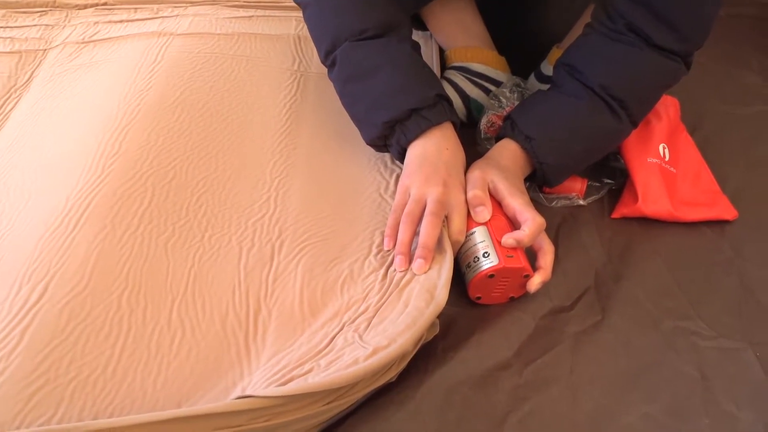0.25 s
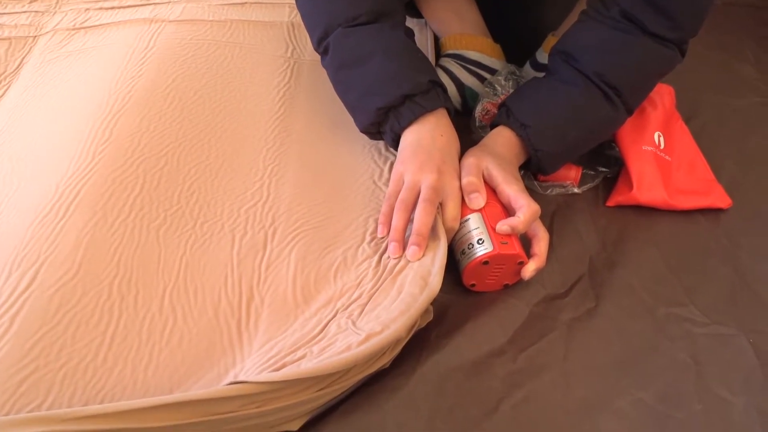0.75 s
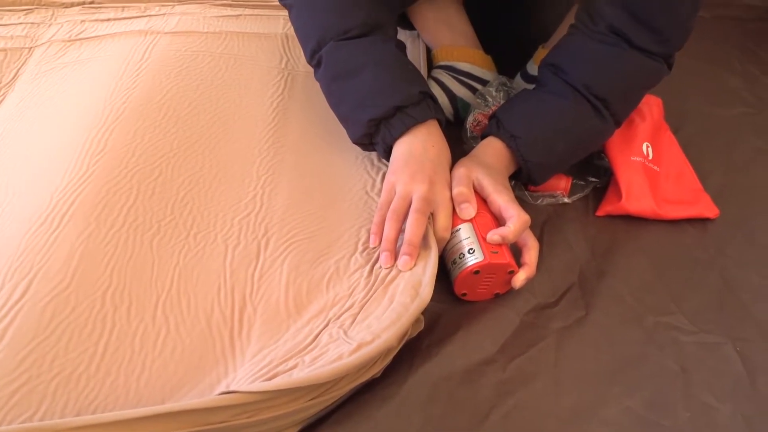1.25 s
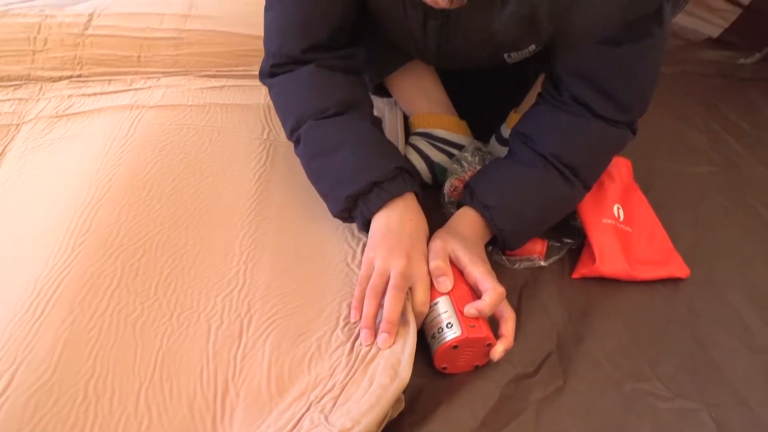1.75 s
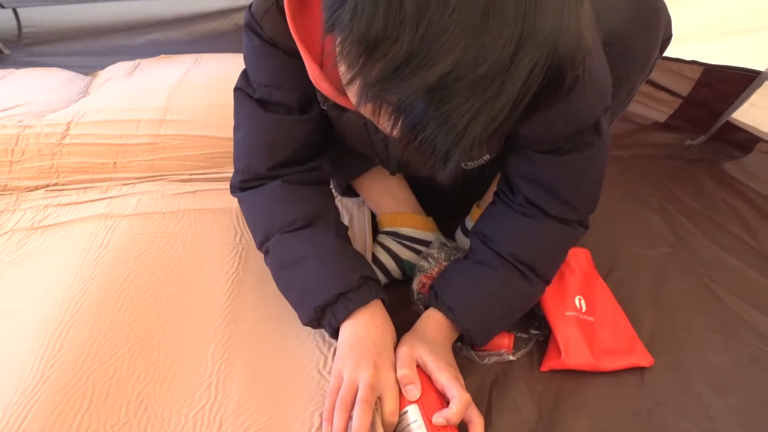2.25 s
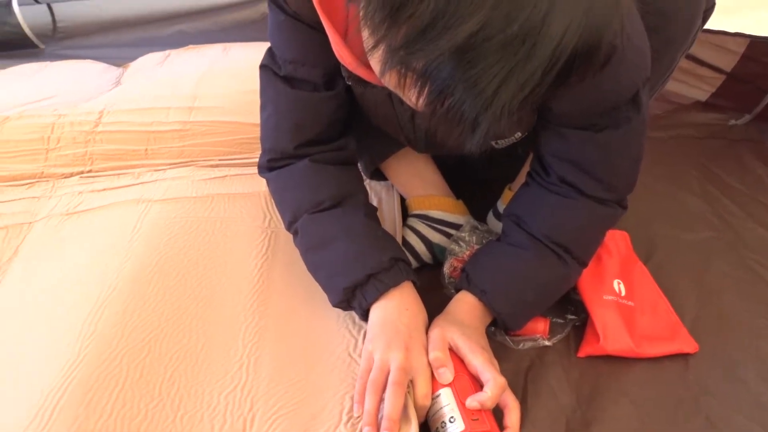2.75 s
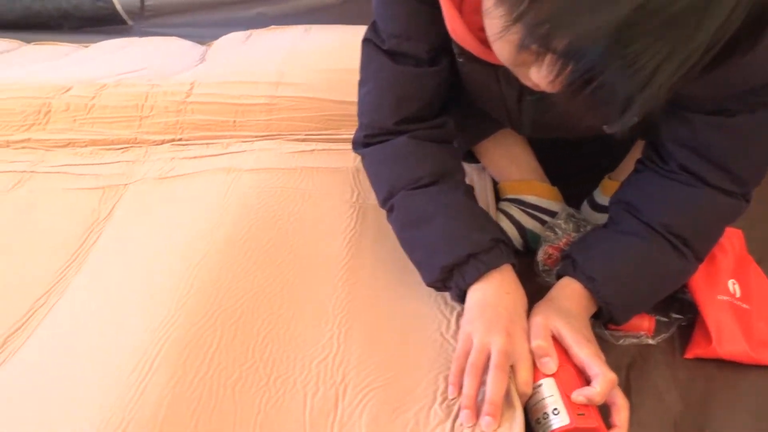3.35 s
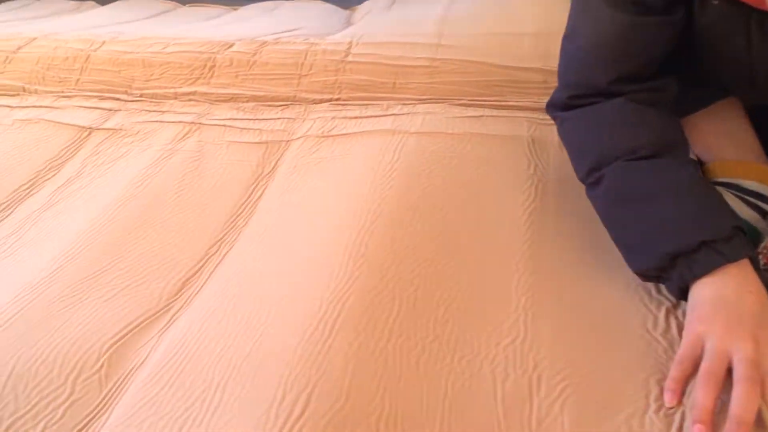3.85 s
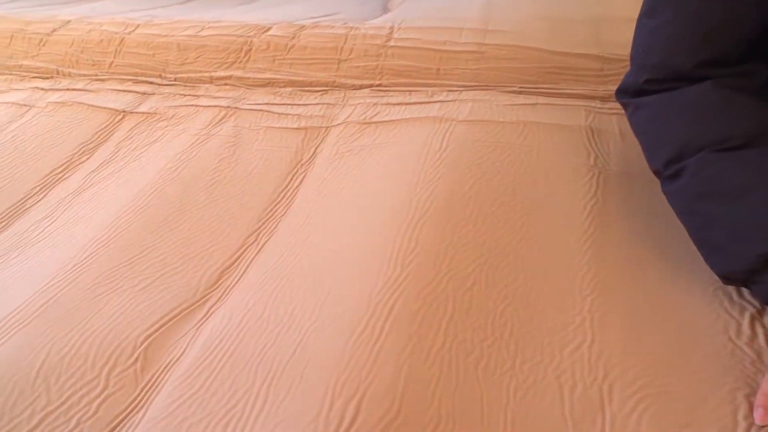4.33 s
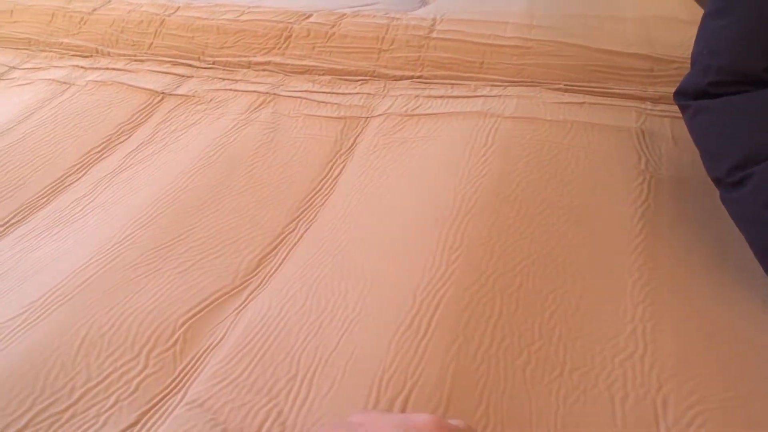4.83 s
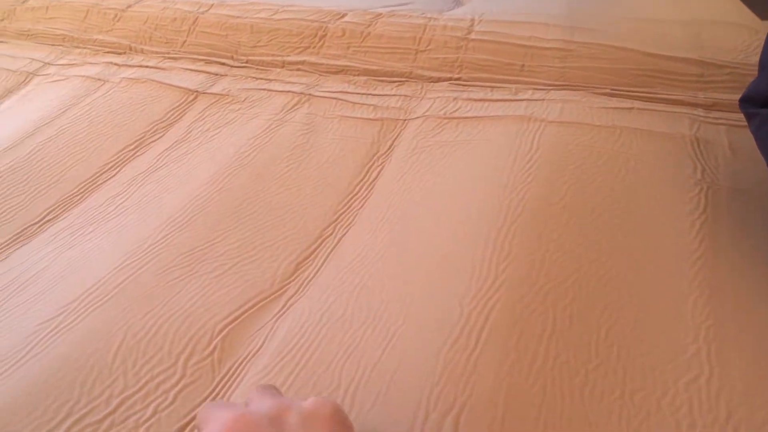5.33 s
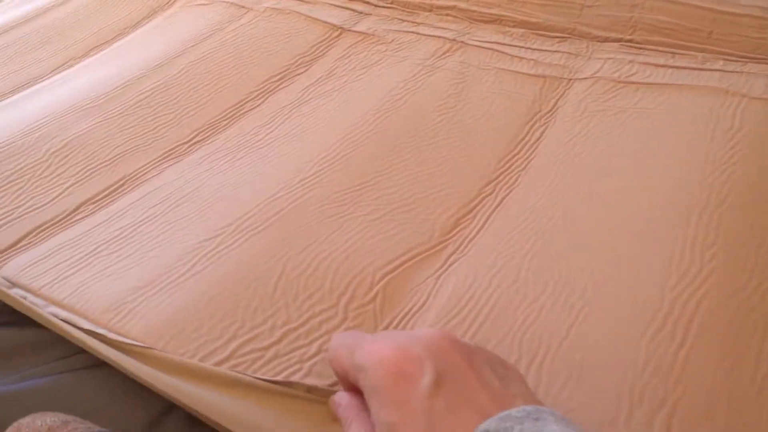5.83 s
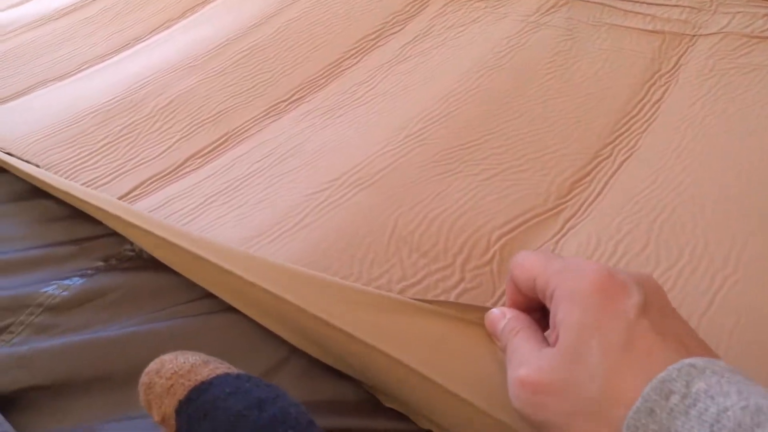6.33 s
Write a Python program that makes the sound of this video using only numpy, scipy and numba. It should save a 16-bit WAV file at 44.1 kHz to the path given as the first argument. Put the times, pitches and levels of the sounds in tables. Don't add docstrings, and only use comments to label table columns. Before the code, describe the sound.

Continuous motor whine and rushing air from a small battery pump filling a mat, strongest on the left, with soft camera knocks and brief cloth squeaks.

```python
import sys
import numpy as np
from scipy import signal
from scipy.fft import rfft, irfft, next_fast_len
from scipy.io import wavfile
from scipy.ndimage import uniform_filter1d
from numba import njit

SR = 44100
rng = np.random.default_rng(int(sys.argv[2]) if len(sys.argv) > 2 else 0)


def output_pcm(signal):
    pcm = np.clip(np.atleast_2d(signal).T, -1, 1) * 32767
    wavfile.write(sys.argv[1], SR, np.round(pcm).astype(np.int16))


def field_ratio(decibels):
    return 10 ** (np.asarray(decibels, dtype=float) / 20)


N = 290158
SIZE = next_fast_len(N)
HOP = 64
T = np.arange(N) / SR
HZ = np.arange(SIZE // 2 + 1) * SR / SIZE
LOG_HZ = np.log(HZ + 1)

# (time [s], aim [row])
AIM = [
    (0, 0),
    (1.6, 0),
    (2.04, 1),
    (3.32, 1),
    (3.74, 2),
    (4.1, 3),
    (5.3, 3),
    (5.75, 4),
    (6.2, 5.5),
    (6.58, 5),
]

# (time [s], peak [dB], centre [Hz], width [Hz], decay [s], left over right [dB])
FABRIC = [
    (2.05, -34, 9000, 7000, 0.065, 12),
    (4.875, -30, 8000, 150, 0.12, 12),
    (6.247, -30, 7900, 2000, 0.14, 16),
    (6.247, -42, 13500, 3000, .09, 14),
]
# (time [s], peak [dB], start [Hz], end [Hz], length [s])
CREAKS = [
    (.005, -42, 540, 290, 0.049),
    (0.116, -45, 370, 440, 0.044),
]

# (frequency [Hz], density [dB/Hz])
RUMBLE = [(2, -30), (5, -8), (10, 5), (20, 5), (30, -7.5), (48, -14.5), (62, -24.5), (90, -74)]
# (peak time [s], level [dB], length [s])
TREMORS = [(.38, -54, 0.25), (1.05, -48, .4), (1.55, -46, .4), (2.2, -60, .4), (2.44, -39, 0.14),
           (2.725, -34.5, 0.34), (2.923, -29, 0.21), (3.15, -49, 0.4), (3.425, -37, 0.41),
           (3.65, -38, 0.32), (3.95, -39, 0.47), (4.25, -40, 0.77), (4.582, -39, .2), (4.757, -36, 0.38),
           (5.168, -34, 0.25), (5.42, -38, 0.43), (5.674, -30, 0.48), (5.95, -41, 0.35), (6.34, -36, 0.68)]
# (frequency [Hz], density [dB/Hz])
GRIP_COLOUR = [(30, -40), (45, -22), (70, -2), (120, -7), (200, -5), (350, -5), (600, -60)]
# (peak time [s], level [dB], length [s])
RUBS = [
    (.35, -72, 1),
    (2.25, -62, 1),
    (3.1, -67, .5),
    (4.15, -64, 0.34),
    (4.98, -54, 0.34),
    (5.95, -55, 0.7),
    (6.45, -60, .5),
]
# (time [s], peak [dB], pitch [Hz], decay [s], left over right [dB])
KNOCKS = [(1.504, -41, 200, 0.073, -9), (2.274, -20, 202, 0.032, 25), (3.014, -36, 150, 0.054, 8),
          (3.958, -33, 190, 0.047, 20), (4.408, -35, 136, 0.043, 18), (4.868, -30, 150, 0.032, 22),
          (4.92, -34, 108, 0.051, 15), (4.97, -33, 135, 0.071, 10), (5.327, -33, 129, 0.044, 19),
          (5.779, -32, 130, .05, 28), (6.235, -35, 110, 0.066, 25), (6.529, -35.5, 130, 0.048, 13)]

# (frequency [Hz], left over right [dB])
RIGHT_LOSS = [(60, 10.0), (110, 9.0), (200, 11.5), (380, 14.1), (700, 19.0), (1290, 15.3), (2380, 14.9),
              (4400, 16.5), (8120, 11), (15000, 13.0)]
# (frequency [Hz], share [0-1])
STRAIGHT = [(60, .1), (300, .2), (600, .6), (1000, .5), (2500, .4), (5000, .3), (15000, .15)]

# (frequency [Hz], density [dB/Hz])
VALVE = [(3500, -61), (5500, 2), (6800, -4), (8500, -7.5), (10500, -9), (12000, -17), (13500, -15),
         (15000, -20), (16000, -23)]
# (turned away [0-1], flow [dB], nozzle [dB], hiss [dB], hiss left over right [dB])
FLOWS = [(.5, -25.5, -29.5, -36.5, 19), (.25, -25.5, -32, -37.5, 13), (.55, -28.5, -26.5, -38, 24),
         (.92, -28.5, -25, -38, 18), (1.03, -28.5, -25.5, -40.5, 8), (1.17, -29.6, -28.5, -42.5, 4)]
# (frequency [Hz], density [dB/Hz])
LOWS = [(60, -44), (150, -30), (300, -11), (410, -13), (700, -2), (1100, -3.5), (1800, -6), (2400, -20),
        (4000, -60)]
# (frequency [Hz], density [dB/Hz])
HIGHS = [(400, -60), (1000, -31), (1750, -3), (2450, -0.5), (3000, -1), (3650, 1), (4100, -0.5), (4500, 4),
         (5600, -2), (6150, -15.5), (6600, -5.5), (8000, -20.5), (11000, -65)]
# (centre [Hz], level [dB], left over right [dB])
INLET = [(912, -26.5, 31), (982, -28.5, 21), (957, -26.5, 20), (910, -34, 24), (827, -28.5, 11),
         (837, -28, 14)]
# (centre [Hz], level [dB], left over right [dB], far pitch [ratio])
VOLUTE = [(1408, -25, 16, 1.025), (1313, -25.5, 5.3, 1.18), (1400, -27, 21, 1.05), (1330, -28.5, 19, 1.04),
          (1290, -32, 15, 0.92), (1385, -32.5, 9.2, 0.97)]
# (centre [Hz], level [dB])
OUTLET = [(5450, -36), (5350, -34), (5270, -30), (5360, -32), (5080, -35), (4815, -52)]
# (peak time [s], level [dB], length [s])
LEAKS = [
    (.35, -37, .5),
    (3.42, -33, 0.97),
    (5.0, -37, 2.5),
]

# (time [s], rate [Hz])
SHAFT = [(0, 315.6), (.42, 315.25), (.7, 315.5), (1.53, 315.65), (1.75, 314.9), (2.1, 315.3), (2.37, 316.4),
         (2.6, 315.9), (3.07, 315.5), (3.22, 314.9), (3.48, 315.1), (3.74, 315.8), (4.0, 315.05),
         (4.65, 314.85), (5.18, 315.35), (5.45, 313.9), (5.72, 315.25), (6.45, 314.25)]
# (shaft multiple, left facing [dB], left away [dB], right facing [dB], right away [dB])
TONES = [(1, -47, -45, -69, -64), (3, -40, -41, -55, -58), (6, -39, -48, -55, -58), (8, -28, -21, -42, -38),
         (9, -40, -43, -53, -58), (10, -37, -38, -53, -53), (11, -34, -35, -55, -49),
         (12, -33, -38, -52, -55), (13, -41, -45, -55, -66), (14, -25, -37, -48, -54),
         (15, -31, -39, -49, -57), (16, -29, -33, -48, -47), (17, -40, -42, -55, -53),
         (18, -42, -40, -54, -50), (19, -41, -46, -54, -56)]
# (left facing [dB], left away [dB])
UPPER = [(-47, -55), (-42, -50), (-45, -54), (-53, -52), (-45, -58), (-56, -52), (-47, -49), (-53, -53),
         (-50, -51), (-52, -46), (-48, -46), (-46, -48), (-42, -53), (-45, -56), (-53, -57), (-45, -48),
         (-51, -54), (-55, -59), (-53, -65), (-49, -55), (-58, -66), (-59, -68), (-60, -70), (-49, -66),
         (-57, -66), (-57, -65), (-60, -71), (-66, -69), (-57, -70), (-54, -80)]
# (x8 [dB], x14 [dB], x16 [dB], brush x29-33 swing [dB], x37 and up swing [dB])
BEAMS = [(-47, -25, -37.5, -1.5, 6), (-24.5, -30.5, -28.5, 1, 3), (-38, -31.5, -31, 2.5, -3),
         (-23, -40.5, -38, 1, -.4), (-17, -31.5, -35, -2, 1.5), (-21, -50, -34, -5, 2)]
# (peak time [s], shaft multiple, gain [dB], length [s])
FLARES = [(0.55, 8, 14, .3), (1.9, 8, 3, 0.22), (1.13, 11, -7, 0.94), (3.35, 11, 7, 2.4),
          (5.3, 11, 2.5, 1.1), (0.94, 12, 6.5, 1.8), (6.1, 13, 3, 1.8), (1.53, 14, 2, 1.8),
          (3.5, 8, 0.5, 0.37), (5, 14, 9, 0.27), (.8, 15, 4, 2.4), (3.5, 15, -12, 1.3), (7.6, 15, 3, 0.5),
          (0.41, 16, -5, .6), (1.1, 16, 7, 0.76), (3, 16, 2.5, 1.8), (3.25, 16, -9, 0.47),
          (4.2, 16, -2, 0.18), (1.3, 17, -9, 1.6), (3.8, 20, -12, 2.8), (3.83, 28, 8, 0.76),
          (5.75, 28, 7, 0.71), (3, 29, -2, 1.6), (2.7, 31, 3, 1.6), (5.75, 31, -7, 0.68), (2.6, 33, 4, 1.9),
          (3.3, 34, 5, 1.2), (3.75, 39, -6, .6), (.8, 48, 9, 2.2)]


def columns(table):
    s, *rest = np.transpose(table)
    return [np.interp(T, s, c) for c in rest]


def aimed(table):
    aim = columns(AIM)[0]
    return [np.interp(aim, np.arange(len(table)), c) for c in np.transpose(table)]


def bump(s, length_s):
    return np.cos(np.pi * np.clip((T[::HOP] - s) / length_s, -.5, .5)) ** 2


def bouts(table, rest_db):
    swells = sum(field_ratio(db) * bump(s, length_s) for s, db, length_s in table)
    return np.interp(T, T[::HOP], field_ratio(rest_db) + swells)


def walk(rate_hz, hop=1):
    hold = int(SR / rate_hz / hop)
    size = len(T[::hop])
    steps = np.repeat(rng.standard_normal(size // hold + 1), hold)
    return 1.29 * uniform_filter1d(uniform_filter1d(steps, hold), hold)[:size]


def along(points):
    hz, value = np.transpose(points)
    return np.interp(LOG_HZ, np.log(hz), value)


def colour(x, gain):
    return irfft(rfft(x, SIZE) * gain, SIZE)[:N]


def noise(points):
    x = colour(rng.standard_normal(N), field_ratio(along(points)))
    return x / x.std()


@njit
def svf(x, hz, width_hz):
    y, band, low = np.empty(len(x)), 0., 0.
    for i in range(len(x)):
        g, k = np.tan(np.pi * hz[i] / SR), width_hz / hz[i]
        v = (band + g * (x[i] - low)) / (1 + g * (g + k))
        band, low, y[i] = 2 * v - band, low + 2 * g * v, k * v
    return y


def to_right(x):
    lag_samples = 4
    share = along(STRAIGHT)
    out = colour(x, np.sqrt(share) * np.exp(-2j * np.pi * HZ * lag_samples / SR))
    t = np.arange(SR // 8) / SR
    for middle_s in (.6, 2.6, 4.6, 6.4):
        tail = rng.standard_normal(len(t)) * (np.exp(-t / .002) + .35 * np.exp(-t / .04))
        tail = tail / np.sqrt(np.sum(tail ** 2))
        bounced = colour(x, np.sqrt(1 - share) * rfft(tail, SIZE))
        out += bounced * np.cos(np.pi / 2 * np.clip((T - middle_s) / 2, -1, 1))
    return out


def echoed(x, lag_s=.00081, share=.2):
    return colour(x, 1 + share * np.exp(-2j * np.pi * HZ * lag_s))


def shaft_angle(rate_hz):
    return 2 * np.pi * np.cumsum(rate_hz) / SR


def cloth():
    out = np.zeros((2, N))
    for s, db, hz, width_hz, decay_s, pan_db in FABRIC:
        puff = svf(rng.standard_normal(N), np.full(N, 1. * hz), 1. * width_hz)
        fall = (T > s) * np.exp(-np.log(1000) * np.maximum(T - s, 0) / decay_s)
        puff = puff / puff.std() * fall
        out += field_ratio(db) * puff * np.array([[1], [field_ratio(-pan_db)]])
    start = slice(0, SR // 4)
    for s, db, from_hz, to_hz, length_s in CREAKS:
        part = np.clip((T[start] - s) / length_s, 0, 1)
        glide = 2 * np.pi * np.cumsum(from_hz + (to_hz - from_hz) * part) / SR
        out[1, start] += field_ratio(db) * np.sin(np.pi * part) * np.sin(glide)
    return out


def hand():
    rumble = noise(RUMBLE) * field_ratio(11.0) * bouts(TREMORS, rest_db=-47.5)
    opposite = -colour(rumble, 1 / (1 + (HZ / 45) ** 4)) * field_ratio(-10.5)
    out = np.array([rumble, opposite])
    rub = field_ratio(8.0 + 3.0 * walk(9.8)) * bouts(RUBS, rest_db=-62)
    out += rub * np.array([noise(GRIP_COLOUR), noise(GRIP_COLOUR) * field_ratio(-10.5)])
    attack_s = 0.0041
    for s, db, hz, decay_s, pan_db in KNOCKS:
        at = slice(int(s * SR) + 1, int(s * SR) + SR // 5)
        t = T[at] - s
        envelope = np.exp(-np.log(1000) * t / decay_s) * (1 - np.exp(-t / attack_s))
        thud = np.sin(2 * np.pi * hz * t) * envelope
        out[:, at] += field_ratio(db + 9.5) / (1 + field_ratio(-pan_db)) * thud * np.array([[1], [field_ratio(-pan_db)]])
    return out


def valve():
    away, _, _, db, pan_db = aimed(FLOWS)
    hiss = noise(VALVE) * (1 + 0.23 * np.sin(shaft_angle(columns(SHAFT)[0])))
    top = colour(hiss, 1 / (1 + (10500. / (HZ + 1)) ** 4))
    hiss = hiss - top + top * field_ratio(-7. * away + 1.5 * walk(5))
    hiss = hiss * field_ratio(db + 6.5 + 0.9 * walk(7.4))
    far = colour(to_right(hiss), 1 / (1 + (HZ / 10000.) ** 2))
    return np.array([hiss, far * field_ratio(-pan_db + 2.5)])


def cavity(hz, width_hz, db, pan_db, far_ratio=0.94):
    ring = rng.standard_normal(N)
    for spread in (1, 1.8, 5.4):
        ring = svf(ring, hz, spread * width_hz)
    ring = ring / ring.std() * field_ratio(db + 1.12 * walk(12))
    core = np.roll(svf(ring, hz * far_ratio, 0.5 * width_hz), 30)
    return np.array([ring, core * field_ratio(-pan_db + 2.0)])


def air():
    _, flow_db, nozzle_db, _, _ = aimed(FLOWS)
    inlet_hz, inlet_db, inlet_pan_db = aimed(INLET)
    volute_hz, volute_db, volute_pan_db, volute_far = aimed(VOLUTE)
    outlet_hz, outlet_db = aimed(OUTLET)
    lows = noise(LOWS) * field_ratio(-26.0 + 0.25 * (flow_db + 27.0))
    highs = echoed(noise(HIGHS)) * field_ratio(flow_db + 5.0 + 0.23 * walk(5.5))
    flow = lows + highs
    broad = np.array([flow, colour(to_right(flow), field_ratio(-along(RIGHT_LOSS) - 1.5))])
    inlet = cavity(inlet_hz, 170., inlet_db + 1.5, inlet_pan_db)
    volute = cavity(volute_hz, 235., volute_db + 3.0, volute_pan_db, volute_far)
    nozzle = cavity(np.full(N, 2350.), 605.0, 1.48 * (nozzle_db + 32.5) - 35.0, 18.0)
    outlet = cavity(outlet_hz, 440.0, outlet_db, 21.0)
    leak = cavity(np.full(N, 3080.), 520., 0, 22.0) * bouts(LEAKS, rest_db=-50.0)
    return broad + inlet + volute + nozzle + outlet + leak


def all_tones():
    tones = list(TONES)
    for k, (facing_db, away_db) in enumerate(UPPER, start=20):
        pan_db = 12. + .2 * (k - 20)
        tones.append((k, facing_db, away_db, facing_db - pan_db, away_db - pan_db))
    return tones


def motor():
    flutter_db, fade_db, jitter_hz = 1.9, 2., .2
    x8_db, x14_db, x16_db, brush_db, top_db = (c[::HOP] for c in aimed(BEAMS))
    beam_db = {8: x8_db, 14: x14_db, 16: x16_db}
    away, _, _, hiss_db, _ = (c[::HOP] for c in aimed(FLOWS))
    shade_db = 1.4 * np.minimum(hiss_db + 39.5, 0)
    turn = shaft_angle(columns(SHAFT)[0] + jitter_hz * walk(40))
    out = np.zeros((2, N))
    for k, left_db, left_away_db, right_db, right_away_db in all_tones():
        left = left_db + away * (left_away_db - left_db)
        right = right_db + away * (right_away_db - right_db)
        if k in beam_db:
            swing = beam_db[k] + 1.4 - left
        else:
            swing = min(k / 10, 1) * fade_db * walk(2.5, HOP)
            if 28 < k < 34:
                swing = swing + brush_db
            elif k > 36:
                swing = swing + top_db
        for s, multiple, db, length_s in FLARES:
            if round(multiple) == k:
                swing = swing + db * bump(s, length_s)
        swing = swing + flutter_db * min(k / 16, 1.4) * walk(30, HOP)
        swing = swing + shade_db * np.clip(k / 10 - 1.5, 0, 1)
        angle = (k * turn % (2 * np.pi)).astype(np.float32)
        levels = left + swing, right + .6 * swing + fade_db * walk(2.5, HOP)
        for side, db, start in zip(out, levels, rng.uniform(0, 2 * np.pi, 2)):
            gain = np.repeat(field_ratio(db).astype(np.float32), HOP)[:N]
            side += gain * np.sin(angle + np.float32(start))
    return np.sqrt(2) * out


def scene():
    return cloth() + hand() + valve() + air() + motor()


def top_cut(x):
    return signal.sosfilt(signal.butter(12, 15730, fs=SR, output="sos"), x)


def record(dry):
    return top_cut(dry)


dry = scene()
out = record(dry)
output_pcm(out)
```